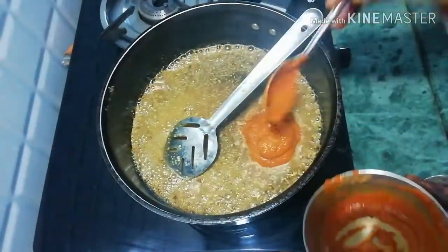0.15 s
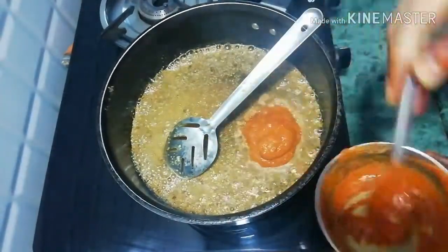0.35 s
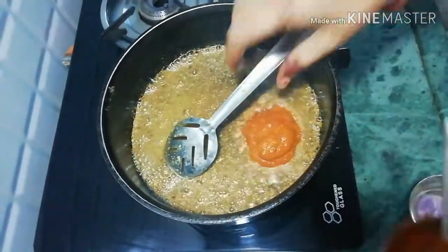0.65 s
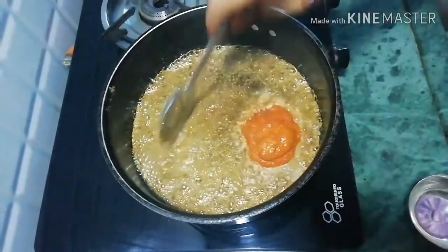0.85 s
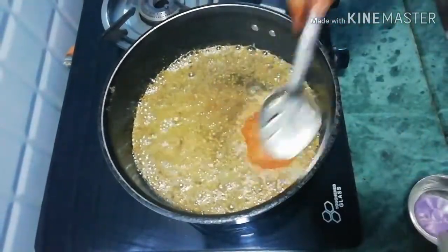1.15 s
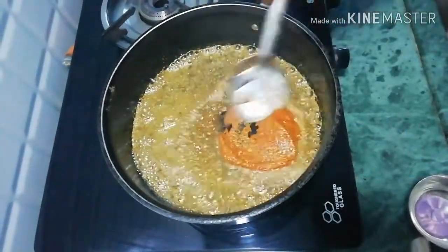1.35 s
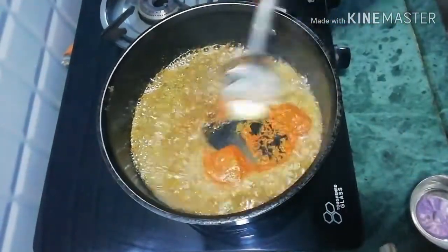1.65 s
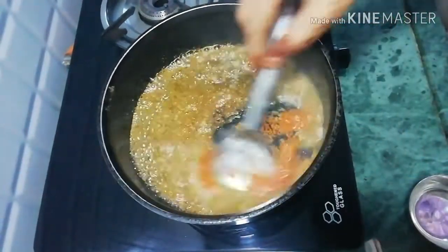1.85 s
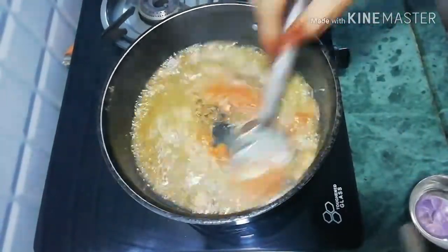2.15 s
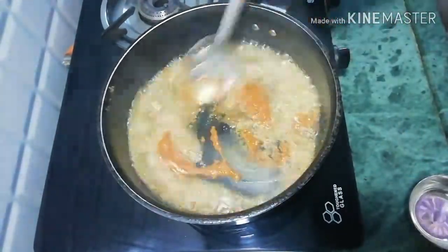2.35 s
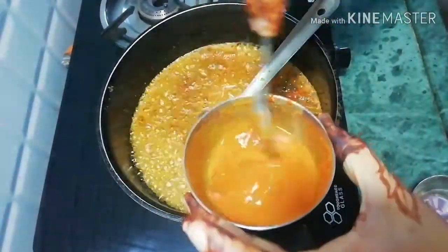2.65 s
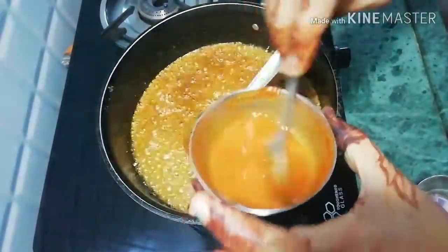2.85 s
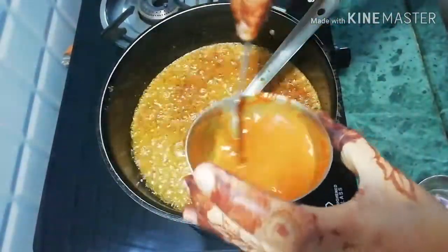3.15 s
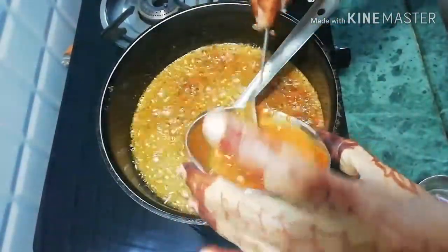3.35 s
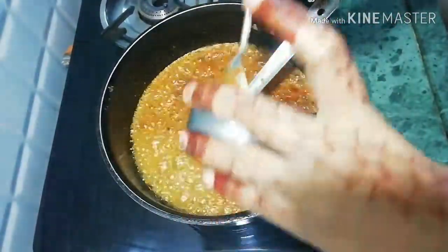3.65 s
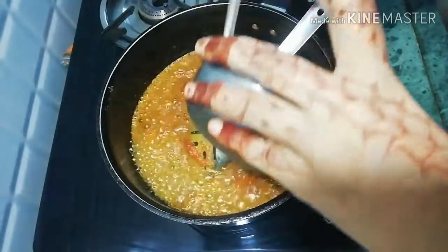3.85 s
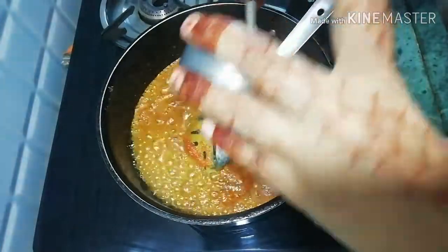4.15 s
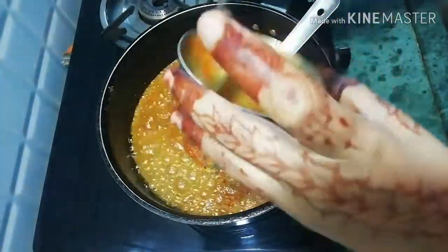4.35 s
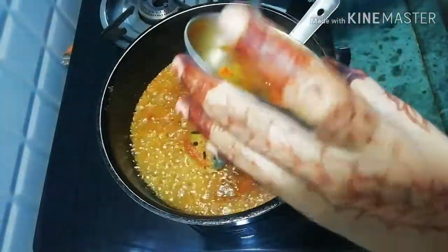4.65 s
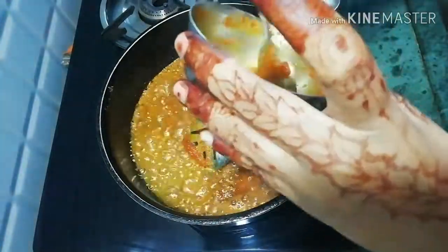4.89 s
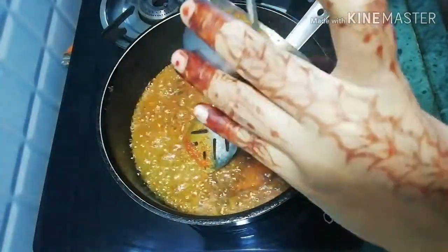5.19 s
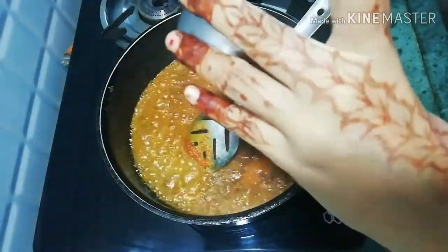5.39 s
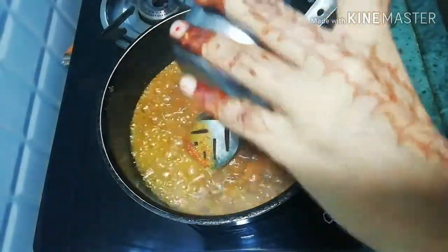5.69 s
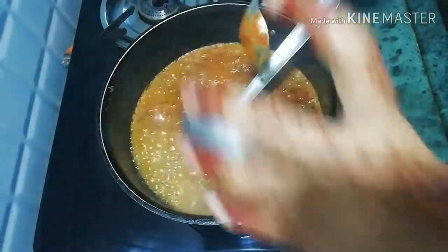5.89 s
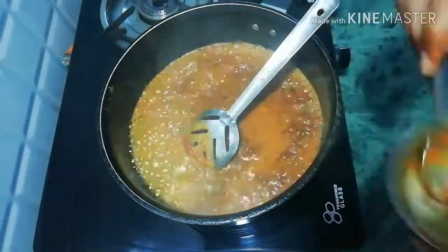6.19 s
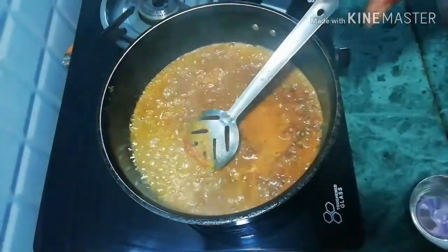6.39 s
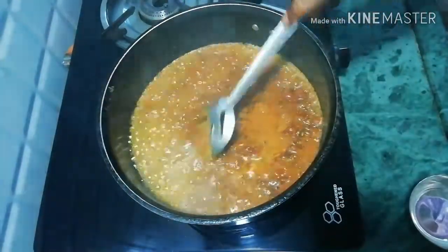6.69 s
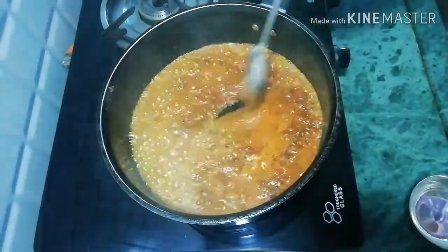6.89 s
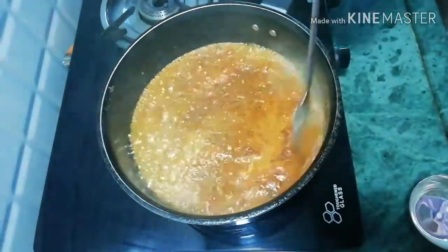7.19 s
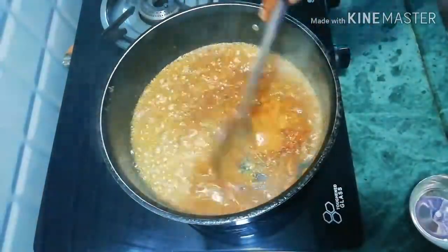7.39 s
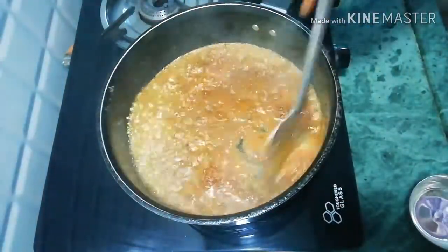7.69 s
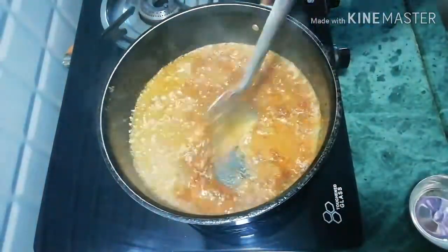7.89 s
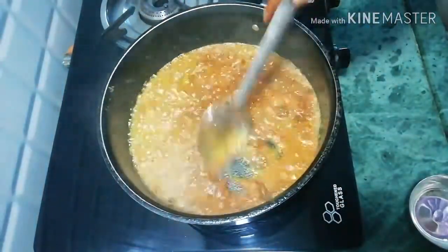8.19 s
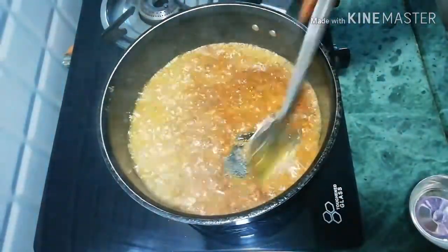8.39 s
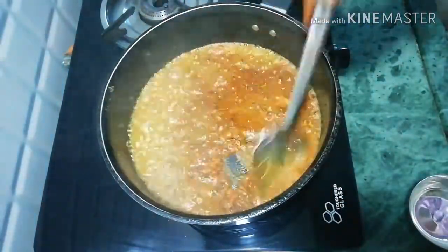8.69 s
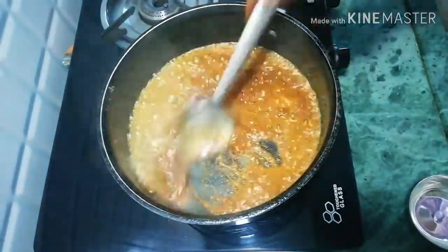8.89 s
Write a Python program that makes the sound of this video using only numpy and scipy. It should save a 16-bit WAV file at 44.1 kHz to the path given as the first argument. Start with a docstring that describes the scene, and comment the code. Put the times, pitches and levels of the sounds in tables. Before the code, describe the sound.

Heard close in a small kitchen with a short reflection, oil sizzles finely and fairly quietly, with a faint spit at 0.3 and a small knock at 0.5 seconds. A sharp spit snaps near 0.9; around 1.1 a steel spoon knocks the pan, then scrapes in short rough drags until 2.6 as the sizzle swells. After two closing knocks the frying drops sharply. From 2.7 to 3.3 a small spoon clinks damply in a full steel bowl, over a faint low hum lasting until 4.5. It wipes around 4, frying rises, and a loud snap at 4.5 begins bright, rattling clinks and scrapes until 5.4. The sizzle and boil grow full. Thin squeaks come at 6.4, then strong scrapes and ringing clanks around 6.8 to 7.1. Softer stirring scrapes, dull bumps and faint thick sloshing continue to 9.

```python
"""Hot oil sizzles as spice paste fries in a pan on an electric hob in a small kitchen: filtered random clicks.
A slotted steel spoon knocks and scrapes round the pan: decaying modes and stick-slip resonances.
A second spoon clinks wet paste out of a steel bowl, likewise, and the sizzle swells again. Oil spits are
noise snaps, squeaks are gliding tones, and a steady sine hums for a while, probably from the hob.
The left microphone port faces the pan."""
import sys
import numpy as np
from scipy import signal
from scipy.fft import rfft, irfft
from scipy.io import wavfile

SR = 44100
rng = np.random.default_rng(int(sys.argv[2]) if len(sys.argv) > 2 else 0)


def materialize(psi):
    """Save the field psi as 16-bit PCM at rate SR to the path in sys.argv[1].

    A 1-D psi becomes a single channel; in a 2-D psi each row is a channel.
    """
    bounded = np.clip(np.atleast_2d(psi).T, -1, 1)
    quanta = np.round(bounded * 32767).astype(np.int16)
    wavfile.write(sys.argv[1], SR, quanta)


N = 398663

# Levels in dB are relative: spectra, rooms and ports shape them further.
# Sizzle of the oil over time. Each row: time in seconds, level in dB.
OIL_LEVEL = [(0.01, -41), (0.69, -39), (1.23, -40), (1.57, -31), (2.6, -30), (2.655, -32.5), (2.69, -40),
             (2.81, -46.5), (3.8, -45.5), (4.2, -38), (4.47, -34), (5.27, -36.5), (5.79, -30.5),
             (5.89, -32), (6.35, -31.5), (7.09, -35), (7.17, -31), (8.77, -33.0), (9.01, -31.5)]
# Boiling of the wet paste over time. Each row: time in seconds, level in dB.
PASTE_LEVEL = [(0.01, -47), (0.23, -54.5), (0.93, -47), (0.99, -50.5), (1.39, -41), (1.95, -41.5),
               (2.63, -41.5), (2.67, -51), (3.17, -51.5), (3.75, -54), (4.07, -42), (4.51, -34.5),
               (6.39, -35.5), (7.27, -37), (7.37, -40.5), (9.01, -37.5)]
# Spectrum of bursts in oil. Each row: frequency in Hz, filter gain in dB.
OIL_SPECTRUM = [(1500, -28), (4000, -9.5), (6300, -6), (8000, -9.5), (9200, -8.5), (10000, -4), (12000, -3),
                (14000, 1), (15000, 4.5), (15700, -2)]
# Spectrum of bursts in paste. Each row: frequency in Hz, filter gain in dB.
PASTE_SPECTRUM = [(300, -27), (520, -14), (720, -1.5), (1000, 0.5), (1200, -3.5), (1500, 0.5), (2100, -2),
                  (3000, 2.5), (4200, -4.5), (5500, -1), (9000, -5.5), (15000, -7.5)]
# Spectrum of the low simmer. Each row: frequency in Hz, filter gain in dB.
SIMMER_SPECTRUM = [(25, -2.5), (60, -0.5), (110, 1), (160, 6.5), (200, 4.5), (245, -4.5), (300, 5),
                   (400, -4), (480, 1.5), (600, -17), (1500, -19.5)]
# Where in the pan the paste boils. Each row: time in seconds, left minus right in dB.
PASTE_BALANCE = [(1.2, -7.5), (2.2, 1.5), (3.2, -7), (4.2, -4), (9.04, -3.5)]
OIL_DB, CRACKLE_DB, PASTE_DB = 7.5, -9, 7
# the low simmer at full boil, and the share of the boil's swing in dB that it follows
SIMMER_DB, SIMMER_FOLLOWS = -56, 0.27

# The pan spoon lands softly, then drags. Each row: start in seconds, length in seconds, landing level in dB,
# scrape level in dB, edge level relative to the scrape in dB, rub of the pan's base in dB.
PAN_STROKES = [(0.777, 0.017, -63, -40.5, 1, -72), (1.154, 0.11, -54, -37, 4, -40),
               (1.375, 0.061, -33, -32, -5, -45.5), (1.461, 0.026, -48, -37.5, -4, -44),
               (1.713, 0.054, -39, -37, -17.5, -45), (1.83, 0.05, -56, -45, 3, -55),
               (1.978, 0.065, -64, -43, 7, -65), (2.036, 0.045, -31, -39, -1, -50),
               (2.299, 0.022, -39, -39.5, 1, -49), (2.337, 0.067, -58, -31, 0, -69),
               (2.516, 0.082, -54, -30, -1, -80), (6.75, 0.25, -64, -31.5, -11, -55),
               (6.874, 0.078, -42, -28, -9, -56), (6.97, 0.044, -37, -41, 9, -61),
               (7.045, 0.083, -33, -44.5, 11, -53), (7.5, 0.035, -35.5, -41, -6.5, -49),
               (7.604, 0.065, -41, -39, 2.5, -56), (7.92, 0.028, -41, -39, -3, -44),
               (8.107, 0.079, -40, -59, -29, -52.5), (8.269, 0.14, -32.5, -42.5, -1, -48),
               (8.42, 0.22, -42, -42, -6, -55.5), (8.725, 0.11, -40, -47, -17, -47),
               (8.899, 0.026, -37, -39, -15, -46.5)]
# Resonances under the spoon's back. Each row: frequency in Hz, width in Hz, level in dB.
BACK_RESONANCES = [(506, 17, -21.5), (891, 87, 3.5), (964, 110, 4.5), (1115, 125, -6)]
# Resonances under the spoon's edge. Each row: frequency in Hz, width in Hz, level in dB.
EDGE_RESONANCES = [(1370, 34, -1.5), (1610, 96, -0.5), (3060, 1200, -12.5)]
# Resonances of the rubbed pan base. Each row: frequency in Hz, width in Hz, level in dB.
BASE_RESONANCES = [(242, 14, -3.5), (304.4, 6.6, 2), (430, 14, -4), (493, 31, 1)]
# Modes of the pan. Each row: frequency in Hz, level in dB, free 60 dB decay time in seconds.
PAN_MODES = [(302, 0, .55), (378, -9, .8), (457, -12, .4), (510, -14, .25), (630, -9, .15), (768, -15, .4),
             (888, -9, .3), (957, -6, .25), (1120, -8, .15), (1240, -9, .15), (1470, -6, .18),
             (1614, -11, .3), (1644, -8, .3), (1674, -10, .8), (1720, -7, .35), (2089, -9, .22),
             (2466, -8, .35), (2516, -5, .5), (2541, -4, .65), (2640, 3, .06), (3488, -13, .3),
             (4657, -12, .45), (5421, -5, .11), (5755, -12, .3), (6406, -10, .21), (7063, -12, .3),
             (8533, -13, .3)]
# Knocks, rung through the pan's modes; the first, at 0.518 s, is a spoon tapped into the bowl. Each row: time
# in seconds, level in dB, # contact band low in Hz, contact band high in Hz, share of the free ring time, crack
# level in dB.
KNOCKS = [(0.518, -18.5, 1380, 7500, 0.023, -2.5), (1.092, -16, 1210, 2550, 0.025, 3),
          (1.153, -22, 524, 16000, 0.81, 12.5), (2.556, -12.5, 875, 1070, 0.34, 9),
          (2.58, -27, 880, 1700, 0.13, -9), (8.573, -38, 250, 1510, 0.17, 8.5)]
# Modes of the slotted spoon. Each row: frequency in Hz, level in dB, free 60 dB decay time in seconds.
SLOTTED_SPOON_MODES = [(905, -17, .3), (1500, 5, .018), (1645, -13, .25), (1800, -13, .15),
                       (2020, -15, .12), (2370, -14, .15), (2758, -9, .3), (2980, 10, .016),
                       (3150, -5, .05), (4600, -3, .028), (5810, -15, .04), (6900, -13, .03),
                       (11500, -13, .05)]
# Its edge glances off the wall and rings by itself. Each row: time in seconds, level in dB,
# tilt in dB per octave, share of the free ring time.
EDGE_CLANKS = [(1.151, -24, -13, 0.19), (6.816, -23.5, 0, 0.57), (7.008, -13.5, 1.5, 0.75),
               (7.048, -23, -4, 0.85)]
# a stroke builds up over a share of its length, holds, and dies away as the spoon lifts
STROKE_RISE_SHARE, STROKE_RELEASE_DB_PER_S = 0.3, 253
# a soft landing: contact band (Hz), share of the free ring time, crack (relative dB)
LANDING_LOW_HZ, LANDING_HIGH_HZ, LANDING_RING, LANDING_CRACK_DB = 315, 895, 0.086, 11
# The pan spoon bumps while pressed down, leaving one short note.
# Each row: time in seconds, frequency in Hz, level in dB, 60 dB decay time in seconds.
PRESSED_BUMPS = [(1.347, 1493, -12, 0.027), (1.346, 950, -20, 0.034), (1.368, 930, -23, 0.067),
                 (2.035, 990, -14, 0.037), (2.038, 1480, -20.5, 0.038), (2.266, 1550, -23, 0.028),
                 (2.374, 1600, -20, .04), (2.419, 990, -18.5, .05), (7.752, 244, -36, 0.13),
                 (8.585, 1530, -28.5, 0.1), (8.789, 254, -31.5, 0.1)]
BUMP_RISE_S, BUMP_ROUGH_DB = 0.0041, 3

# Modes of the bowl, emptied. Each row: frequency in Hz, level in dB, free 60 dB decay time in seconds.
EMPTY_BOWL_MODES = [(1330, -5, .07), (1420, -7, .4), (1600, -10, .12), (2700, -3, .06), (2890, -2, .06),
                    (3020, -5, .08), (3200, -4, .12), (4690, -14, .12), (5560, -15, .1), (6250, -17, .2),
                    (7084, -20, 1.3), (8059, -21, .9)]
# Modes of the bowl, holding paste. Each row: frequency in Hz, level in dB, free 60 dB decay time in seconds.
FULL_BOWL_MODES = [(1070, -7.5, 0.067), (1350, -1, 0.028), (2130, 1, 0.036), (2370, 0.5, 0.034),
                   (3030, -3, 0.095), (3260, -3, 0.096), (4100, -4, 0.038), (4570, -8, 0.042),
                   (5100, -15, 0.055)]
# Spoon against bowl; where it lands and how the bowl is gripped leave one note ringing on.
# Each row: time in seconds, level in dB, tilt in dB per octave (harder contact is brighter),
# share of the free ring time, note frequency in Hz, note level in dB.
BOWL_CLINKS = [(2.703, -29, -11.5, 0.32, 1080, -44), (2.736, -41, -10, 0.27, 2360, -41),
               (2.82, -28.5, -3, 0.27, 3170, -30), (2.835, -44, -3, 0.4, 2980, -35),
               (2.876, -18.5, 5.5, 0.24, 1063, -30), (3.02, -40, -2, 0.55, 3180, -43),
               (3.198, -28.5, -7, 0.15, 2430, -36), (3.312, -39, 0, 0.36, 2420, -47),
               (4.513, -16.5, 5, 0.073, 1330, -24), (4.550, -9, -3, 0.12, 2705, -17.5),
               (4.617, -33, -2, 0.6, 3170, -22), (4.832, -12.5, -2.5, 0.34, 2860, -13.5),
               (4.981, -16, 1.5, 0.28, 2780, -20), (5.148, -15.5, 2, 0.17, 3245, -27),
               (5.386, -20.5, 0, 0.18, 3010, -28), (6.271, -27.5, 9, 0.32, 1410, -27)]
# The small spoon wipes round the bowl. Each row: start in seconds, length in seconds, level in dB.
BOWL_WIPES = [(2.668, 0.12, -48), (2.8, 0.22, -49), (3.162, 0.16, -46), (3.882, 0.048, -46),
              (3.968, 0.38, -39), (4.56, 0.11, -34.5), (4.84, 0.16, -31), (6.27, 0.15, -37.5)]
# Resonances of the scraped, emptied bowl. Each row: frequency in Hz, width in Hz, level in dB.
BOWL_RESONANCES = [(1337, 235, 5.5), (1404, 260, 8), (2050, 71, -1.5), (2634, 67, 2), (3540, 670, -4),
                   (5400, 820, -3), (6430, 190, -7.5), (7200, 140, 0.5), (7970, 160, -4)]
EMPTIED_S = 3.7  # when the bowl is tipped out
BOWL_NOTE_T60_S = 0.091
# in the emptied bowl the spoon bounces after a clink: range of time between touches (s), loss per touch (dB)
BOUNCE_MIN_S, BOUNCE_MAX_S, BOUNCE_LOSS_DB = 0.00324, 0.0114, 12.5
# steel still touching the ringing metal makes each mode flutter
FLUTTER_DB, FLUTTER_PER_S = 2.8, 110

# A spoon's edge catches on the steel and squeaks or groans, gliding as the contact slides.
# Each row: start in seconds, length in seconds, first frequency in Hz, last frequency in Hz, level in dB.
EDGE_SQUEAKS = [(1.161, 0.089, 311, 306, -41), (1.298, 0.043, 370, 379, -44.5),
                (1.841, 0.12, 312, 305, -51), (2.725, 0.049, 2420, 2090, -47.5),
                (2.768, 0.017, 3080, 3130, -45), (2.823, 0.019, 3220, 3080, -50),
                (3.21, 0.018, 2340, 2190, -46), (3.268, 0.022, 3200, 3150, -55),
                (4.026, 0.1, 1430, 1317, -44.5), (4.555, 0.032, 1516, 1636, -31),
                (4.63, 0.024, 3140, 2990, -32), (4.863, 0.013, 1416, 1466, -29),
                (6.416, 0.078, 1300, 1298, -37.5), (6.514, 0.027, 1280, 1360, -36),
                (6.526, 0.019, 1740, 1660, -38), (6.816, 0.013, 2795, 2760, -32),
                (6.845, 0.01, 915, 977, -29), (6.9, 0.047, 1080, 963, -29), (6.941, .027, 900, 1064, -24),
                (6.976, 0.02, 1165, 1420, -35)]
SQUEAK_RISE_SHARE, SQUEAK_RELEASE_DB_PER_S = 0.48, 700
SQUEAK_WAVER, SQUEAK_ROUGH_DB = 0.015, 3.5  # waver as a share of the frequency
# Oil spits. Each row: time in seconds, snap level in dB, level of the puff of air in dB.
OIL_SPITS = [(0.285, -22, -65), (0.946, -4.5, -25), (1.516, -6, -22), (3.057, -15.5, -70), (3.98, -17, -70),
             (4.514, 3, -75), (8.605, -21.5, -72)]
# The spoon pushes the thickened paste about. Each row: start in seconds, length in seconds, level in dB.
PASTE_SLOSHES = [(6.9, .42, -53), (7.7, .8, -59), (8.553, 0.42, -57)]
# Resonances of the sloshing paste. Each row: frequency in Hz, width in Hz, level in dB.
SLOSH_RESONANCES = [(162, 50, -5), (245, 65, 2.5)]

# A low hum, probably from the hob; each spell sags towards its end.
# Each row: start in seconds, length in seconds, level in dB.
HOB_HUM = [(2.638, 1.88, -49.5), (4.848, 1.12, -61)]
HUM_HZ, HUM_RISE_S, HUM_SAG_DB, HUM_RELEASE_DB_PER_S = 85.5, 0.027, 6, 300
KITCHEN_T60_S, KITCHEN_DB = 0.17, -10
# Balance of the microphone ports. Each row: frequency in Hz, left minus right in dB.
PORT_BALANCE = [(100, 0.5), (350, -1), (500, 3.5), (680, 15), (950, 14.5), (1350, 6), (1700, 1),
                (2800, 9.5), (4500, 4), (6300, 1), (7600, -5.5), (9000, 2.5), (10500, 7.5), (12500, 13.5),
                (15000, 19)]
LOWPASS_EDGE_HZ = 15400


def frying():
    """Bubble bursts: tiny in the oil, bigger in wet paste; a quiet pan lets single crackles stand out."""
    oil, paste = gains(OIL_LEVEL), gains(PASTE_LEVEL)
    heat = oil / oil.max()
    simmer = (paste / paste.max()) ** SIMMER_FOLLOWS
    # hotter oil bursts more often; the division offsets part of the loudness this adds
    fizz = colour(grains(4000 + 18000 * heat, spread_db=2.0, width_s=.0002), OIL_SPECTRUM)
    fizz = rms_one(fizz / np.sqrt(0.46 + 0.34 * heat))
    boil = rms_one(colour(grains(14000, spread_db=2.5, width_s=.00018), PASTE_SPECTRUM))
    # bubbles burst in small clusters, so both layers flutter
    fizz = fizz * from_db(1.3 * drift(220) + .9 * drift(30) + .5 * drift(8))
    boil = boil * from_db(1.0 * drift(160) + .6 * drift(30))
    crackle = rms_one(colour(grains(320, spread_db=5.5, width_s=0.00096), OIL_SPECTRUM))
    crackle = crackle / np.sqrt(heat + 0.054)
    blubs = rms_one(colour(grains(2500, spread_db=4.0, width_s=0.00017), SIMMER_SPECTRUM))
    leftward = gains(PASTE_BALANCE) ** np.array([[.5], [-.5]])  # half the difference to each side
    out = oil * (from_db(OIL_DB) * fizz + from_db(CRACKLE_DB) * crackle)
    out += from_db(PASTE_DB) * paste * boil * leftward
    return out + from_db(SIMMER_DB) * simmer * blubs


def pan_spoon():
    """Friction and impact: the slotted spoon lands, drags its back and edge over the base, and knocks; one
    knock is a spoon tapped into the bowl."""
    starts, lengths, landing_db, scrape_db, edge_db, base_db = np.transpose(PAN_STROKES)
    back = rub(BACK_RESONANCES, per_s=900, judder_db=2.6, wander=.04)
    edge = rub(EDGE_RESONANCES, per_s=700, judder_db=2.4)
    base = rub(BASE_RESONANCES, per_s=700, judder_db=2.0)
    scrape = strokes(starts, lengths, scrape_db) * back
    scrape += strokes(starts, lengths, scrape_db + edge_db) * edge
    out = from_db(-2.0) * scrape + strokes(starts, lengths, base_db) * base
    for s, db in zip(starts, landing_db):
        landing = knock(LANDING_LOW_HZ, LANDING_HIGH_HZ, LANDING_RING, LANDING_CRACK_DB)
        add(out, s, from_db(db) * landing)
    for s, db, low_hz, high_hz, ring, crack_db in KNOCKS:
        add(out, s, from_db(db) * knock(low_hz, high_hz, ring, crack_db))
    for s, db, tilt_db, ring in EDGE_CLANKS:
        clank = strike(SLOTTED_SPOON_MODES, ring, crack_db=4, crack_t60=.011, wash_db=4, tilt_db=tilt_db)
        add(out, s, from_db(db) * without_bass(clank))
    return out


def knock(low_hz, high_hz, ring, crack_db):
    """Modal excitation: where a blow lands picks the pan's modes, and pressing the spoon down damps them."""
    band_hz = np.clip([low_hz, max(high_hz, 1.1 * low_hz)], 20, .45 * SR)
    contact = signal.butter(2, band_hz, "band", fs=SR, output="sos")
    blow = strike(PAN_MODES, ring, crack_db + 8.5, crack_t60=0.051 + 0.008 * ring, wash_db=15.0 - 6.0 * ring)
    return signal.sosfilt(contact, blow)


def bumps():
    """Heavy damping: under the pressed spoon the pan gives dull, brief notes."""
    out, t = np.zeros((2, N)), np.arange(SR // 4) / SR
    for s, hz, db, t60 in PRESSED_BUMPS:
        rough_db = BUMP_ROUGH_DB * drift(400)[:len(t)]
        envelope = np.minimum(t / BUMP_RISE_S, 1) * from_db(db - 60 * t / t60 + rough_db)
        add(out, s, tone(hz, envelope))
    return out


def bowl_spoon():
    """Mass loading: paste alters the modes of the wiped and clinked hand-held bowl until it is tipped out."""
    full = np.arange(N) < EMPTIED_S * SR
    wet_resonances = [(hz, 90, db) for hz, db, t60 in FULL_BOWL_MODES[:6]]
    stirring = rub(wet_resonances, per_s=330, judder_db=2.0, wander=0.077)
    scraping = rub(BOWL_RESONANCES, per_s=1400, judder_db=3.5, wander=0.035)
    out = strokes(*np.transpose(BOWL_WIPES)) * np.where(full, stirring, scraping)
    t = np.arange(SR // 3) / SR
    for s, db, tilt_db, ring, note_hz, note_db in BOWL_CLINKS:
        modes = FULL_BOWL_MODES if s < EMPTIED_S else EMPTY_BOWL_MODES
        clink = strike(modes, ring, crack_db=1.0, crack_t60=0.007, wash_db=-34, tilt_db=tilt_db)
        add(out, s, from_db(db) * clink)
        if s > EMPTIED_S:
            add(out, s, bounces(db))
        add(out, s, tone(note_hz, from_db(note_db - 60 * t / BOWL_NOTE_T60_S)))
    return without_bass(out)


def bounces(db):
    """Inelastic rebound: a short rattle of ever weaker touches on the bowl, at uneven intervals."""
    out = np.zeros((2, SR // 2))
    delays = np.cumsum(rng.uniform(BOUNCE_MIN_S, BOUNCE_MAX_S, size=4))
    for k, delay in enumerate(delays, 1):
        touch = strike(EMPTY_BOWL_MODES, ring=.08, crack_db=2, crack_t60=.008, wash_db=10)
        at = round(delay * SR)
        out[:, at:at + touch.shape[1]] += from_db(db - BOUNCE_LOSS_DB * k) * touch
    return out


def squeaks():
    """Mode locking: stick and slip settle on one resonance for a moment, a rough, wavering glide."""
    out = np.zeros((2, N))
    for s, length, first_hz, last_hz, db in EDGE_SQUEAKS:
        pressure = gesture(length, SQUEAK_RISE_SHARE * length, SQUEAK_RELEASE_DB_PER_S)
        size = len(pressure)
        glide_hz = np.interp(np.arange(size) / SR, [0, length], [first_hz, last_hz])
        hz = glide_hz * (1 + SQUEAK_WAVER * drift(250)[:size])
        roughness = from_db(db + SQUEAK_ROUGH_DB * drift(200)[:size])
        add(out, s, tone(hz, np.sqrt(2) * pressure * roughness))
    return out


def spits():
    """Explosive boiling: a water drop bursts in the oil with a sharp snap and a puff of air, often very faint."""
    snaps, puffs, t = np.zeros((2, N)), np.zeros((2, N)), np.arange(SR // 20) / SR
    for s, db, puff_db in OIL_SPITS:
        add(snaps, s, from_db(db - 60 * t / .005) * rng.standard_normal((2, len(t))))
        puff = from_db(puff_db - 60 * t / 0.014) * np.sin(2 * np.pi * 55 * t)
        add(puffs, s, puff * np.ones((2, 1)))
    return without_bass(colour(snaps, OIL_SPECTRUM)) + puffs


def sloshing():
    """Viscous flow: thick paste gurgles softly round the moving spoon, as irregularly driven low resonances."""
    gurgle = rub(SLOSH_RESONANCES, per_s=300, judder_db=5.0, wander=0.088)
    return strokes(*np.transpose(PASTE_SLOSHES)) * gurgle


def hob():
    """Steady oscillation: a low, nearly pure hum that comes in spells."""
    level = np.zeros((1, N))
    for s, length, db in HOB_HUM:
        spell = gesture(length, HUM_RISE_S, HUM_RELEASE_DB_PER_S, HUM_SAG_DB)
        add(level, s, from_db(db) * spell[None])
    return level * np.sqrt(2) * np.sin(2 * np.pi * HUM_HZ * np.arange(N) / SR)


def kitchen(x):
    """Reverberation: dense, decaying reflections off tiles and worktop, different at each port."""
    t = np.arange(SR // 2) / SR
    tail = rng.standard_normal((2, len(t))) * from_db(-60 * t / KITCHEN_T60_S) * (t > .003)
    tail = signal.sosfilt(signal.butter(1, [250, 9000], "band", fs=SR, output="sos"), tail)
    return signal.oaconvolve(x, rms_one(tail) / np.sqrt(len(t)), axes=1)[:, :N]


def grains(per_s, spread_db, width_s):
    """Shot noise: uneven random clicks, each from its own spot and so with its own lag at the right port."""
    born = rng.random(N) < per_s / SR
    sizes = from_db(spread_db * np.minimum(rng.exponential(1, N), 5))
    clicks = born * rng.choice([-1, 1], N) * sizes
    lag = np.round((rng.standard_normal(N) + .5) * width_s * SR).astype(int)
    right = np.bincount((np.arange(N) + lag) % N, clicks, N)
    return rms_one(np.array([clicks, right]))


def rub(modes, per_s, judder_db, wander=.03):
    """Stick-slip friction: uneven bursts drive resonances that shift as the contact moves; rms 1."""
    slips = grains(per_s, spread_db=2.5, width_s=0.000095) * from_db(judder_db * drift(70))
    out = 0
    for k, (hz, width, db) in enumerate(modes):
        r = np.exp(-np.pi * width / SR)  # pole radius sets the bandwidth
        poles = [1, -2 * r * np.cos(2 * np.pi * hz / SR), r * r]
        out = out + (-1) ** k * from_db(db) * signal.lfilter([1 - r, 0, r - 1], poles, slips)
    # reading at an uneven speed bends the resonances
    reading = np.cumsum(1 + wander * drift(18)) % N
    return rms_one(np.array([np.interp(reading, np.arange(N), side) for side in out]))


def strike(modes, ring, crack_db, crack_t60, wash_db, tilt_db=0):
    """Modal decay: a short crack, the clear modes, and a wash of weak modes too dense to tell apart."""
    t = np.arange(int(np.clip(.6 * ring, .1, .7) * SR)) / SR
    crack, wash = rng.standard_normal((2, 2, SR))[..., :len(t)] * .5
    crack = signal.sosfilt(signal.butter(1, 11000, fs=SR, output="sos"), crack)
    wash_band = [modes[0][0], modes[0][0] + 2200]
    wash = signal.sosfilt(signal.butter(1, wash_band, "band", fs=SR, output="sos"), wash)
    out = from_db(crack_db - 60 * t / crack_t60) * crack
    out += from_db(wash_db - 60 * t / (0.33 * ring)) * wash
    for hz, db, t60 in modes:
        # each port hears a mode a little differently
        phase = rng.uniform(0, 2 * np.pi) + rng.normal(0, 1.0, (2, 1))
        size = from_db(db + tilt_db * np.log2(hz / 2500) + rng.normal(0, 1, (2, 1)))
        swell = 1 - np.exp(-t * hz)  # low modes take longer to build up
        flutter_db = np.interp(t * FLUTTER_PER_S, np.arange(100), rng.normal(0, FLUTTER_DB, 100))
        decay = from_db(flutter_db - 60 * t / (t60 * ring))
        out += size * swell * decay * np.sin(2 * np.pi * hz * t + phase)
    return out


def tone(hz, envelope):
    """Phase accumulation: a steady or gliding note, at a phase of its own at each port."""
    phase = rng.uniform(0, 2 * np.pi) + rng.normal(0, 1.0, (2, 1))
    cycles = np.cumsum(hz * np.ones(len(envelope))) / SR
    return envelope * np.sin(2 * np.pi * cycles + phase)


def gesture(length, rise_s, release_db_per_s, sag_db=0):
    """Envelope that rises, holds (perhaps sagging) until its length is over, then decays exponentially."""
    t = np.arange(int(length * SR) + SR // 4) / SR
    fall_db = sag_db * (t / length) ** 2 + release_db_per_s * np.maximum(t - length, 0)
    return np.minimum(t / rise_s, 1) * from_db(-fall_db)


def strokes(starts, lengths, levels_db):
    """Contact pressure of a spoon over a run of strokes, as a gain per sample."""
    out = np.zeros((1, N))
    for s, length, db in zip(starts, lengths, levels_db):
        press = gesture(length, STROKE_RISE_SHARE * length, STROKE_RELEASE_DB_PER_S)
        add(out, s, from_db(db) * press[None])
    return out


def without_bass(x):
    """Radiation efficiency: sources as small as spoons and bowl radiate no low notes."""
    return signal.sosfilt(signal.butter(2, 800, "high", fs=SR, output="sos"), x)


def colour(x, points):
    """Causal (minimum-phase) filter through (Hz, dB) points, by way of the cepstrum."""
    size = 4096
    hz, db = np.transpose(points)
    bins_hz = np.arange(size // 2 + 1) * SR / size
    log_gain = np.log(from_db(np.interp(np.log(bins_hz + 1), np.log(hz), db)))
    cepstrum = irfft(log_gain)[:size // 2]
    cepstrum[1:] *= 2
    response = irfft(np.exp(rfft(cepstrum, size)))[None, :size // 2]
    return signal.oaconvolve(x, response, axes=1)[:, :N]


def drift(rate):
    """Random fluctuation with spread near 1: straight lines between rate knots per second."""
    knots = rng.standard_normal(4000)
    return np.interp(np.arange(N) / SR * rate, np.arange(len(knots)), knots)


def gains(rows):
    """The dB column of a (s, dB) curve as a gain per sample."""
    s, db = np.transpose(rows)
    return from_db(np.interp(np.arange(N) / SR, s, db))


def from_db(db):
    """Decibels to amplitude gain."""
    return 10 ** (np.asarray(db) / 20)


def rms_one(x):
    """Scale to rms 1."""
    return x / np.sqrt(np.mean(x ** 2) + 1e-20)


def add(out, s, sound):
    """Superposition: mix a short sound in at time s."""
    at = round(s * SR)
    out[:, at:at + sound.shape[1]] += sound[:, :N - at]


def scene():
    """Superposition of pan, spoons and bowl with their reverberation, and the hum."""
    near = frying() + pan_spoon() + bumps() + bowl_spoon() + squeaks() + spits() + sloshing()
    return near + from_db(KITCHEN_DB) * kitchen(near) + hob()


def record(dry):
    """Directivity and limits: the ports share each band unevenly; peaks are rounded and the top is cut."""
    ports = []
    for k, sign in enumerate((-1, 1)):
        # the power gains of the two ports add up to 2
        balance = [(hz, 10 * np.log10(2 / (1 + 10 ** (sign * db / 10)))) for hz, db in PORT_BALANCE]
        ports.append(colour(dry[[k]], balance))
    rounded = np.tanh(np.vstack(ports))
    return signal.sosfilt(signal.ellip(10, .3, 80, LOWPASS_EDGE_HZ, fs=SR, output="sos"), rounded)


dry = scene()
out = record(dry)
materialize(out)
```